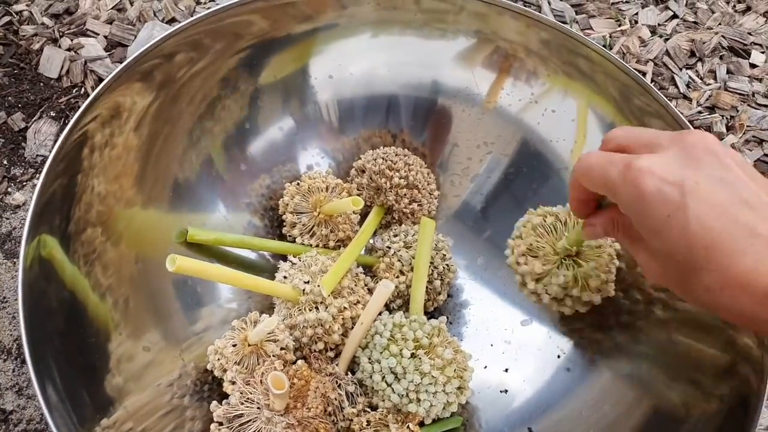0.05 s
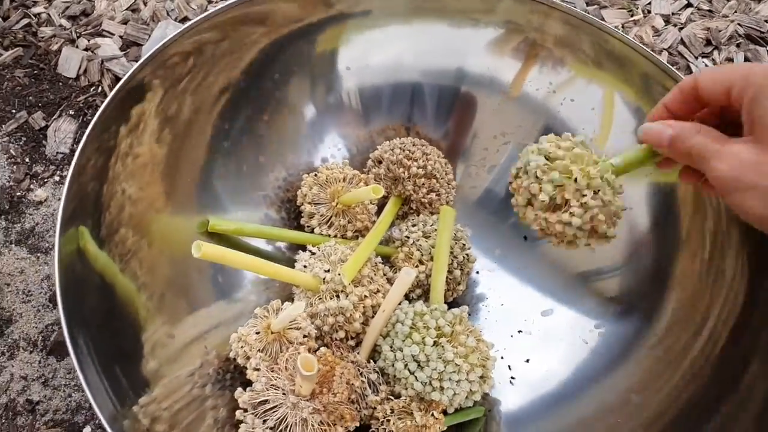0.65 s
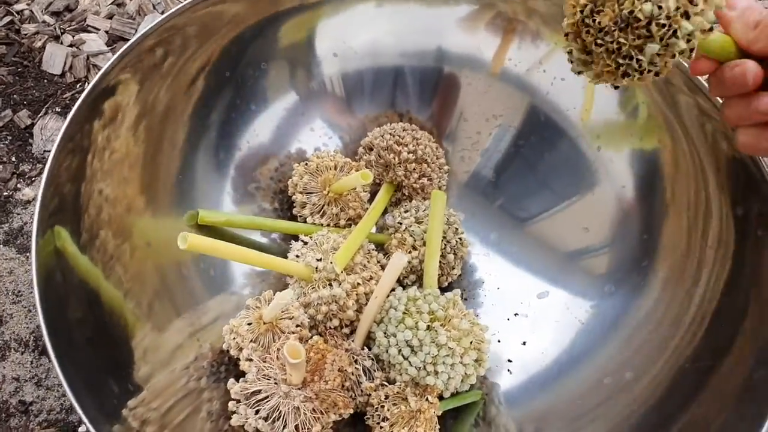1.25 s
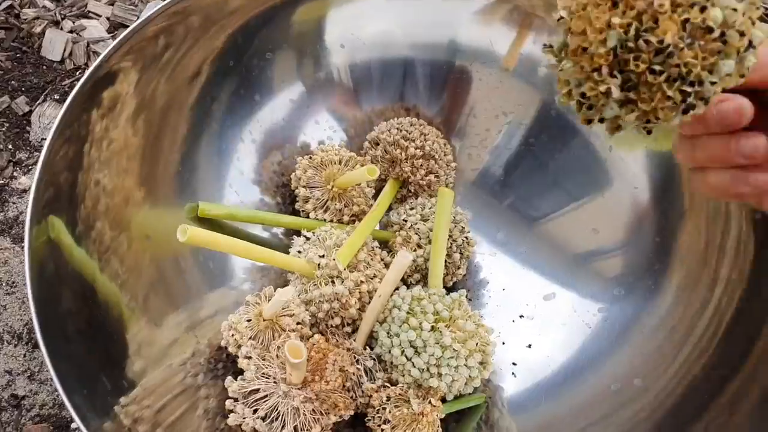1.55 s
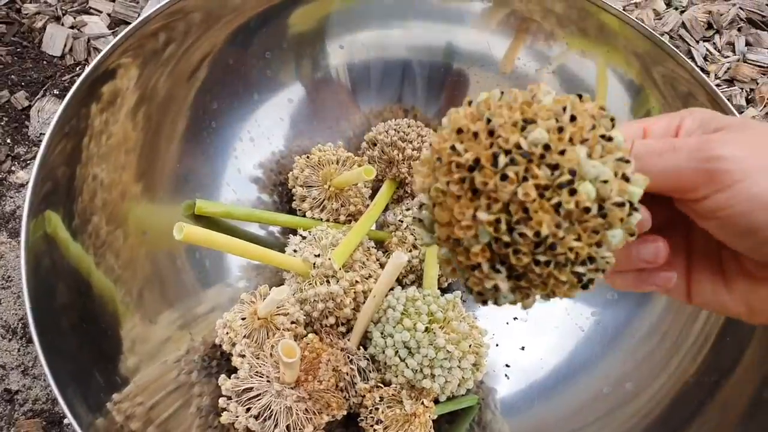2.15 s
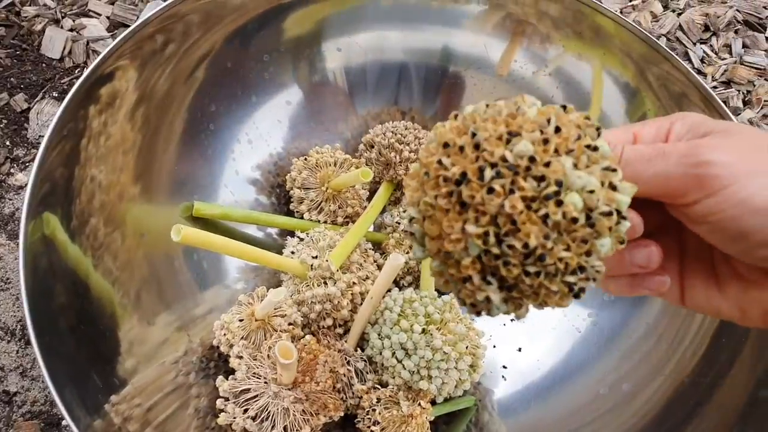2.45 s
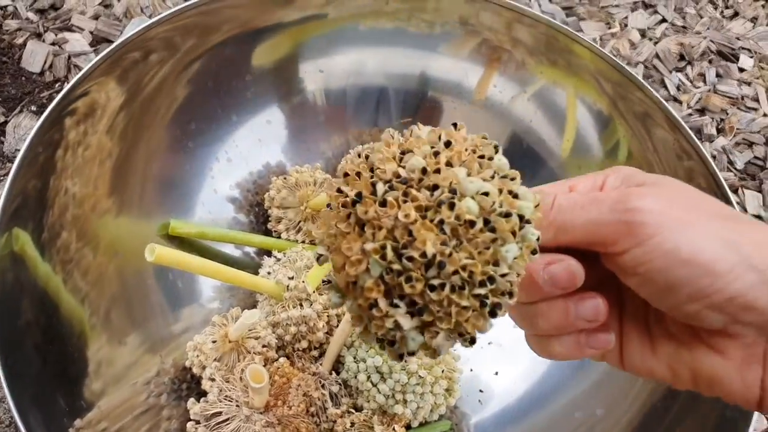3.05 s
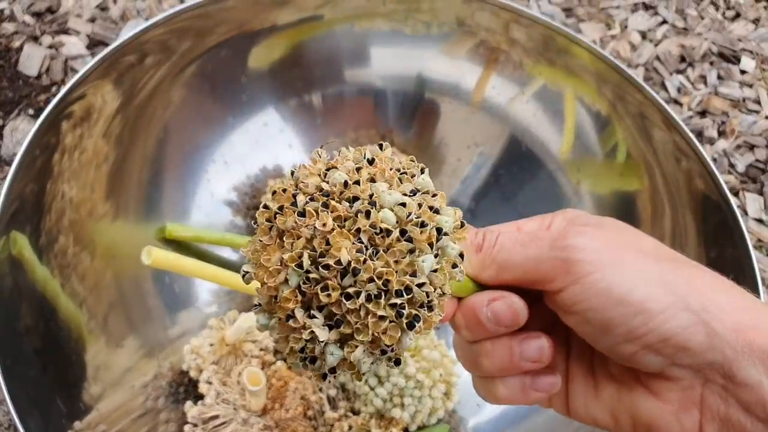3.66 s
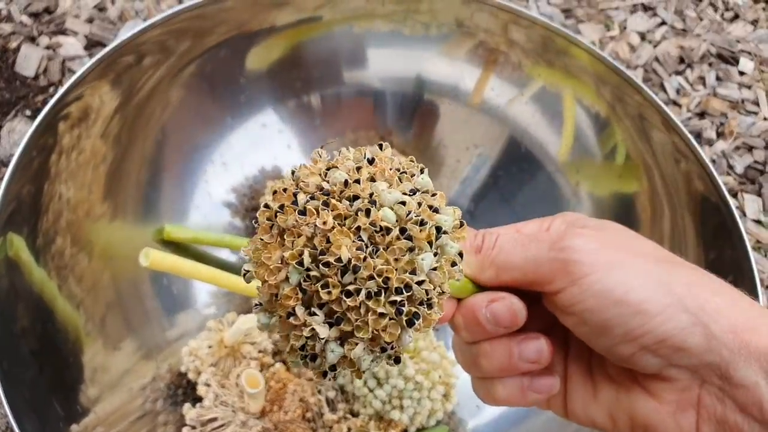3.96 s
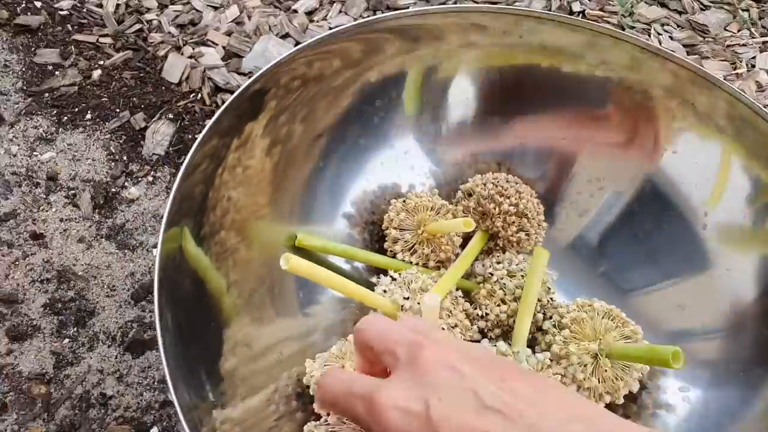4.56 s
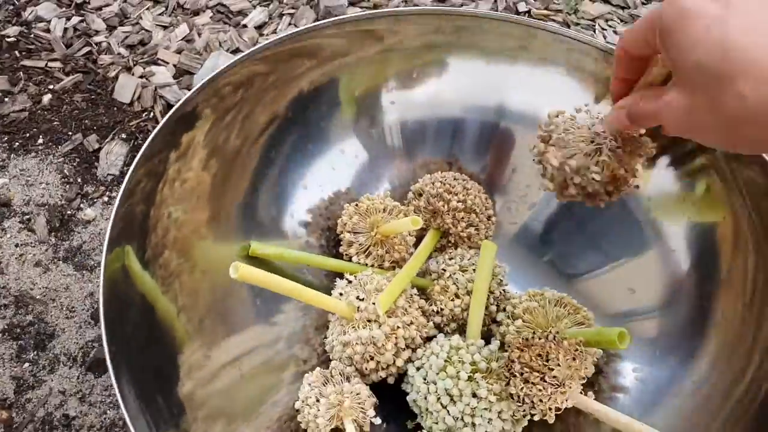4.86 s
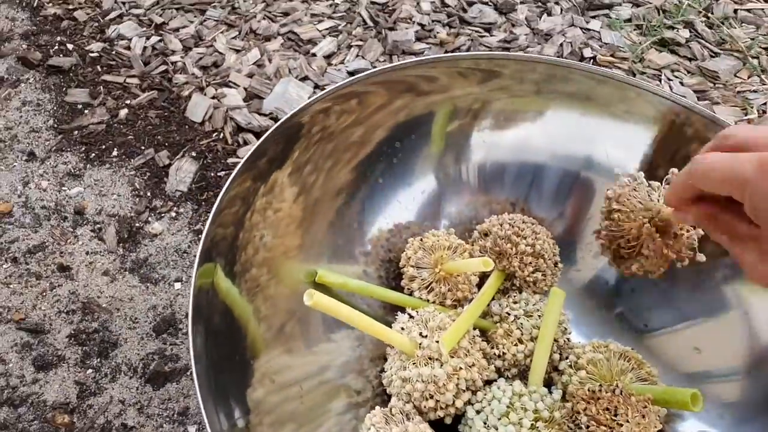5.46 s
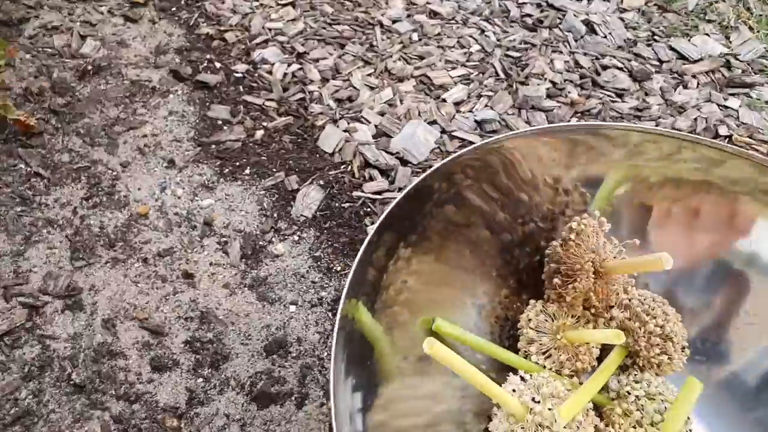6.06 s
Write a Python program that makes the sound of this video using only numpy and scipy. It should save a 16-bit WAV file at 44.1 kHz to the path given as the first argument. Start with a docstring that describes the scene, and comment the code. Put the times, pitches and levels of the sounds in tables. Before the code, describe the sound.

A few quick knocks of dry flower heads shower hard seeds into a metal bowl, which rings brightly. Low wind buffets a hand-held microphone, mostly on the right, and eases into lighter gusts in the quiet open air. Toward the end come dull, rasping handling noises as the grip shifts, along with small papery snaps of rubbed husks and a faint hum from the bowl.

```python
"""In quiet outdoor air, dry seed heads knock against a steel bowl for the first second, and loose seeds
patter on the ringing metal. Wind buffets the two microphones of a hand-held phone, hardest around one
second in, then in weaker gusts, with the odd finger tap and husk snap. From about 4.3 s the grip shifts:
fingers scuff the case while a seed head is rubbed, its husks crackling and the bowl humming faintly."""
import sys
import numpy as np
from scipy import signal
from scipy.fft import rfft, irfft
from scipy.io import wavfile
from scipy.ndimage import uniform_filter1d

SR = 44100
rng = np.random.default_rng(int(sys.argv[2]) if len(sys.argv) > 2 else 0)


def store_pcm(level_fs):
    """Save levels as 16-bit WAV."""
    pcm = np.round(np.clip(level_fs, -1, 1) * 32767).astype(np.int16)
    wavfile.write(sys.argv[1], SR, np.atleast_2d(pcm).T)


N = 277830
T = np.arange(N) / SR

# tone of the outdoor air: pitch_hz, level_db
AIR_TONE = [(30, -18.5), (150, -23.5), (350, -9.5), (550, -23.5), (800, -17), (1000, -23), (1400, -24),
            (2500, -30.5), (5000, -37), (8500, -39), (13000, -39.5), (15500, -49.5)]
# knocks that each throw a shower of seeds at the bowl: start_s, level_db, fade_s
KNOCKS = [(0.0262, -28.5, 0.0092), (0.0946, -48.5, 0.0083), (0.15, -48, 0.0086), (0.2137, -25.5, 0.014),
          (0.3997, -29, 0.013), (0.5318, -35.5, 0.0053), (0.553, -43, 0.024), (0.618, -46.5, 0.021),
          (0.6554, -41.5, 0.0056), (0.6845, -35.5, 0.0046), (0.7387, -47.5, 0.0097), (0.8138, -50, 0.0038),
          (0.8325, -58.5, 0.0081)]
# loose seeds skittering round the bowl: time_s, level_db
SKITTER = [(0.0, -55.5), (0.592, -69.5), (0.718, -64.5), (0.85, -66), (0.92, -96)]
# tone of a click on the steel wall: pitch_hz, level_db
STEEL_TONE = [(900, -35), (1500, -17), (2700, -26), (3400, -22.5), (3950, -11), (4500, -4.5), (5200, -18.5),
              (5900, -8.5), (6900, -11.5), (8000, -15), (10400, -7.5), (15500, -13.5)]
# the wall's strongest high notes: pitch_hz, level_db, ring_s
WALL_NOTES = [(4450, -9.5, 0.13), (4487, 8, 0.13), (4300, -8.5, 0.35), (4920, 6.5, 0.33),
              (4829, -43.5, 0.273), (4918, -17, .3), (5170, 0, 0.26), (5660, 0.5, .25), (6350, -0.5, 0.23)]
# short ping of one seed on the wall: pitch_hz, level_db, ring_s
PING_NOTES = [(4420, -10.5, 0.0071), (4636, -7, 0.036), (4912, -3.5, 0.021), (5410, -5.5, 0.0066)]
# strength of the breeze, mostly on the right microphone: time_s, level_db
BREEZE = [(0, -36.5), (0.76, -38.5), (0.87, -27.5), (1.08, -37.5), (1.35, -55.5), (1.52, -56.5),
          (1.75, -40), (1.91, -52.5), (2.8, -49.5), (3.25, -59), (3.8, -59.5), (4.08, -48), (4.32, -56.5),
          (4.45, -76)]
# gusts swirling round the phone: middle_s, length_s, rumble_db, sputter_db, left_minus_right_db
GUSTS = [(0.12, 0.037, -31.5, -56.5, -12), (0.25, 0.068, -31, -47, -8), (0.311, 0.046, -29.5, -44.5, -8),
         (0.502, 0.025, -34.5, -50, -5), (0.584, 0.055, -31, -46, -4), (0.852, 0.065, -35, -39, -7.5),
         (0.952, 0.048, -30, -34, -4), (1.046, 0.082, -26, -46, -4.5), (1.154, 0.053, -31, -52.5, -2),
         (1.213, 0.025, -36, -60, -28), (1.279, 0.023, -40, -56.5, -6), (1.427, 0.033, -44.5, -58, -32),
         (1.553, 0.029, -43, -53, -20.5), (1.617, 0.028, -43.5, -79, -4), (1.684, 0.048, -38, -59.5, -2.5),
         (1.82, 0.051, -32.5, -53.5, -12.5), (2, 0.034, -49, -56.5, -28), (2.153, 0.049, -42, -59, -1),
         (2.221, 0.045, -43, -53.5, -28), (2.343, 0.042, -35, -57, -19), (2.496, 0.053, -33, -47, -28),
         (2.634, 0.033, -36.5, -64, 0), (2.862, 0.031, -34, -57, -1.5), (3.036, 0.067, -44.5, -69, -2),
         (3.135, 0.057, -44.5, -87, -1.5), (3.357, 0.02, -43, -76, -7), (3.8, 0.048, -53.5, -80, 0.5),
         (3.933, 0.064, -50.5, -64.5, -22), (4.12, 0.032, -32.5, -55.5, -7), (4.179, .05, -35.5, -60.5, 3),
         (4.302, 0.073, -43, -70, 0.5)]
# tone of the large swirls of air: pitch_hz, level_db
RUMBLE_TONE = [(20, -16.5), (40, -5.5), (62, 4), (85, 3), (120, -3.5), (155, -11.5), (210, -16), (270, -22),
               (400, -38.5), (800, -74)]
# tone of the small swirls of air: pitch_hz, level_db
SPUTTER_TONE = [(100, -17), (190, -2.5), (370, 3.5), (500, -4.5), (780, -19.5), (980, -26), (2000, -49.5),
                (5000, -72)]
# single slaps of wind: middle_s, level_db, pitch_hz, left_minus_right_db
WIND_SLAPS = [(0.1206, -23, 110, -5), (0.2486, -18.5, 97, -15), (0.309, -14, 100, -25),
              (0.339, -22, 204, -8), (0.3912, -21, 97, -33), (0.494, -26, 82, 1), (0.5807, -34, 94, 20),
              (0.7396, -24.5, 78, -36), (0.8379, -20.5, 178, -4), (0.8957, -16, 114, -20),
              (0.9429, -15, 300, 1), (0.9945, -21, 104, -14), (1.045, -16, 98, -10),
              (1.141, -21.5, 170, -7), (1.276, -24.5, 89, -0.5), (1.6732, -36.5, 96, 13),
              (1.8116, -25, 93, -19), (2.2218, -29, 82, -27), (2.4842, -27.5, 89, -31),
              (2.8658, -23.5, 91, -5), (4.1185, -30, 77.5, -3.5)]
# fingers slipping or tapping on the case: middle_s, level_db, pitch_hz
SLIPS = [(0.271, -30.5, 845), (0.674, -36.5, 605), (1.554, -54, 603), (2.421, -49.5, 1050),
         (3.581, -60.5, 516), (3.616, -56, 551), (4.4166, -37.5, 557), (4.4567, -33.5, 700),
         (4.4735, -29.5, 774), (4.4974, -39.5, 1010), (4.5303, -38, 750), (4.5392, -29.5, 830),
         (4.5736, -36.5, 940), (4.598, -36, 700), (4.6217, -35, 731), (4.668, -36, 700), (4.679, -33, 750),
         (4.7037, -36.5, 754), (4.7673, -40, 640), (4.8017, -34, 900), (4.8289, -29, 810),
         (4.8412, -40, 1170), (4.8725, -32, 705), (4.9003, -31, 730), (4.9295, -32, 764), (4.951, -37, 645),
         (5.0103, -35, 700), (5.0461, -29.5, 690), (5.1397, -31.5, 560), (5.179, -40, 810),
         (5.254, -35.5, 750), (5.2734, -34, 830), (5.2877, -26.5, 720), (5.308, -36, 1095),
         (5.3301, -26.5, 766), (5.369, -27, 730), (5.3805, -30, 570), (5.4362, -41, 730),
         (5.4894, -32.5, 536), (5.59, -46.5, 444), (5.6178, -42.5, 720), (5.711, -44, 616),
         (5.7793, -36, 654), (5.801, -29.5, 600), (5.8414, -33, 630), (5.8564, -29.5, 760),
         (5.8679, -38, 730), (5.9304, -35, 570)]
# dull tone of the phone's case: pitch_hz, level_db
CASE_TONE = [(30, -21.5), (150, -17.5), (280, -10.5), (430, -0.5), (620, 0), (820, -4.5), (1050, -12),
             (1500, -19), (2500, -26.5), (5000, -51.5)]
# tone of rasping skin: pitch_hz, level_db
RASP_TONE = [(500, -3), (1200, 5), (1800, 0.5), (2500, -3), (3200, -3), (4000, -11.5), (5200, -22.5),
             (8000, -34)]
# finger strokes across the case: start_s, length_s, scuff_db, rasp_db
STROKES = [(4.353, .06, -49.5, -63.5), (4.442, 0.06, -42, -51), (4.465, 0.016, -34, -43.5),
           (4.513, 0.024, -38.5, -63), (4.565, 0.054, -43, -51), (4.65, 0.059, -42.5, -48),
           (4.754, 0.042, -39.5, -57), (4.781, 0.067, -38.5, -40.5), (4.857, 0.088, -41.5, -48.5),
           (4.956, 0.065, -47.5, -62), (4.992, 0.094, -45, -53), (5.074, 0.04, -45, -64),
           (5.183, 0.022, -48.5, -67), (5.214, 0.058, -47, -55), (5.268, 0.12, -38.5, -43),
           (5.397, 0.028, -42, -46.5), (5.755, 0.1, -42.5, -53.5), (5.874, 0.026, -47.5, -72),
           (6.115, 0.13, -64.5, -73.5), (6.24, 0.054, -63, -67.5)]
# the light touch that lasts between strokes: start_s, length_s, scuff_db, rasp_db
LIGHT_TOUCH = [(4.36, 1.58, -56, -75.5)]
# dry husks snapping: start_s, level_db
SNAPS = [(1.2157, -69.5), (1.736, -60), (2.5253, -64), (4.4437, -60), (4.5277, -57), (4.578, -53),
         (4.7594, -57), (4.8, -54), (4.997, -61), (5.07, -48.5), (5.349, -47), (5.37, -47.5),
         (5.454, -50.5), (5.477, -49.5), (5.524, -48.5), (5.545, -47), (5.5878, -54), (5.6137, -52),
         (5.6363, -61), (5.6614, -55.5), (5.6867, -58), (5.7094, -63), (5.7306, -51.5), (5.7563, -51),
         (5.781, -49.5), (5.8062, -50), (5.83, -47.5), (5.9257, -52.5), (6.0002, -61), (6.0362, -73),
         (6.133, -56), (6.179, -58), (6.2575, -59)]
# tone of crackling husks: pitch_hz, level_db
HUSK_TONE = [(1500, -15), (3200, -7.5), (5000, -8.5), (7500, -2), (10000, -0.5), (13000, 0), (15500, -15)]
# rubs of the seed head between the fingers: start_s, length_s, level_db
RUBS = [(4.315, 0.18, -73), (4.56, .14, -66), (4.748, 0.18, -69), (4.985, 0.44, -64.5), (5.05, 0.055, -60),
        (5.48, 0.4, -68), (5.895, .04, -63), (5.995, 0.055, -76.5), (6.11, 0.077, -60),
        (6.245, 0.061, -70.5)]
# low notes of the whole bowl bending: pitch_hz, level_db, ring_s
BOWL_NOTES = [(420, 4, 0.078), (486, -12, 1), (607, 8, 0.11), (706, -6, 0.25), (820, -2, 0.65),
              (947, -9, 0.86), (1084, -11.5, 0.16), (1237, -11, 0.37), (1540, -42, 1)]
# the bowl's hum under the rubbing: time_s, level_db
HUM = [(4.3, -68), (4.5, -77), (5.6, -106), (6.03, -68), (6.14, -58.5), (6.3, -58.5)]


def amp(db):
    """Turn decibels into a gain, a number to multiply a sound by."""
    return 10 ** (np.asarray(db) / 20)


def unit(x):
    """Scale a sound to an average power of 1."""
    return x / np.sqrt(np.mean(x ** 2))


def swell(table):
    """Gain that follows (time_s, level_db) points and fades quickly beyond their ends."""
    times, levels = np.transpose(table)
    outside_s = np.maximum(np.maximum(times[0] - T, T - times[-1]), 0)
    return amp(np.interp(T, times, levels) - 400 * outside_s)


def sides(left_minus_right_db):
    """Left and right gains with an average power of 1."""
    pair = amp(np.array([left_minus_right_db, -left_minus_right_db]).reshape(2, -1) / 2)
    return pair / np.sqrt(np.mean(pair ** 2, axis=0))


def tone(points, size=8192):
    """A click whose tone follows (pitch_hz, level_db) points, for use as a filter."""
    hz, db = np.transpose(points)
    pitches = np.maximum(np.arange(size // 2 + 1) * SR / size, 1)
    cepstrum = irfft(np.log(amp(np.interp(np.log(pitches), np.log(hz), db))))
    # keep the tone but move the energy to the start of the click
    cepstrum[1:size // 2] *= 2
    cepstrum[size // 2 + 1:] = 0
    click = irfft(np.exp(rfft(cepstrum)))
    return click / np.linalg.norm(click)


def through(x, response):
    """Filter both channels with a tone, ring or tail."""
    return signal.fftconvolve(x, np.atleast_2d(response), axes=1)[:, :x.shape[1]]


def ring(notes):
    """Notes of struck metal, each dying away by 60 dB in its ring_s."""
    t = T[:SR]
    ringing = sum(amp(db - 60 * t / ring_s) * np.sin(2 * np.pi * (hz * t + rng.random((2, 1))))
                  for hz, db, ring_s in notes)
    return unit(ringing) / np.sqrt(SR)


def tail(fade_s):
    """A fading wash of noise, different on the left and right."""
    return unit(rng.standard_normal((2, SR)) * np.exp(-T[:SR] / fade_s)) / np.sqrt(SR)


def grains(per_s, spread_db, shared):
    """Random tiny hits of uneven size; a share of them reaches both microphones alike."""
    hits = (rng.random((3, N)) < per_s / SR) * rng.choice([-1, 1], (3, N))
    hits = hits * amp(spread_db * np.clip(rng.standard_normal((3, N)), -2, 2))
    return unit(np.sqrt(1 - shared) * hits[:2] + np.sqrt(shared) * hits[2])


def flutter(rate_hz, depth_db):
    """Gain that wanders at random, on its own at each microphone."""
    hold = int(SR / rate_hz)
    steps = np.repeat(rng.standard_normal((2, N // hold + 1)), hold, axis=1)[:, :N]
    return unit(amp(depth_db * uniform_filter1d(steps, hold, axis=1)))


def even(x, span_s):
    """Even out slow changes in loudness, keeping the grain faster than span_s."""
    power = uniform_filter1d(x ** 2, int(span_s * SR), axis=1)
    return x / np.sqrt(np.abs(power) + 1e-9)


def thump(hz, cycles, phase_spread):
    """A brief pressure wave, loudest 0.05 s in, out of step between the microphones."""
    t = T[:SR // 10] - 0.05
    phase = rng.uniform(0, 2 * np.pi) + phase_spread * rng.standard_normal((2, 1))
    return np.exp(-(t * hz / cycles) ** 2) * np.cos(2 * np.pi * hz * t + phase)


def add(out, start_s, sound):
    """Mix a short sound in at start_s."""
    start = int(np.clip(start_s * SR, 0, N - 1))
    out[..., start:start + sound.shape[-1]] += sound[..., :N - start]


def gestures(table, level_column=2, rise_s=0.015, fade_s=0.015):
    """Gain of hand movements: each rises, holds until its length is up and dies away."""
    power, age = np.zeros(N), T[:2 * SR]
    for row in table:
        start_s, length_s = row[:2]
        shape = np.minimum(age / rise_s, 1) * np.exp(-np.clip((age - length_s) / fade_s, 0, 20))
        add(power, start_s, (amp(row[level_column]) * shape) ** 2)
    return np.sqrt(power)


def outdoor_air(hiss_db=-81.5):
    """Quiet, steady air, its level set by the hiss above 1500 Hz."""
    air = through(rng.standard_normal((2, N)), tone(AIR_TONE))
    hiss = signal.sosfilt(signal.butter(4, 1500, "high", fs=SR, output="sos"), air)
    return air / hiss.std() * amp(hiss_db)


def seeds(rise_s=0.0071, early_s=0.00298, bounce_s=0.022):
    """Each knock throws a shower of hard seeds at the steel; they click, bounce and ring the wall."""
    t = T[:SR // 3]
    shower = np.zeros(N)
    rolling = amp(-2) * swell(SKITTER)
    for start_s, db, fade_s in KNOCKS:
        add(shower, start_s - early_s, amp(db - 3) * np.minimum(t / rise_s, 1) * np.exp(-t / fade_s))
        add(rolling, start_s, amp(db - 17) * np.exp(-t / bounce_s))
    hits = shower * even(grains(per_s=2500, spread_db=5, shared=0.3), 0.008)
    hits += rolling * grains(per_s=1500, spread_db=3, shared=0.3)
    # the few heavier seeds are heard one by one
    heavy = even(grains(per_s=220, spread_db=3, shared=0.7), 0.04)
    pings = through((rolling + amp(-2) * shower) * heavy, ring(PING_NOTES))
    clicks = through(hits, tone(STEEL_TONE))
    shimmer = amp(-7) * through(clicks, tail(fade_s=0.068))
    ringing = amp(-13) * through(hits, ring(WALL_NOTES))
    return (amp(-3) * clicks + pings + shimmer + ringing) * sides(2.9)


def wind_strength(breeze_side_db=-27, sputter_side_share=0.1165, growth=1.42):
    """Gains of large and small swirls in a one-sided breeze with gusts; small ones reach both sides."""
    breeze = swell(BREEZE)
    sputter = amp(-50) * (breeze / amp(-37)) ** growth  # small swirls grow faster than the breeze
    large_power = (breeze * sides(breeze_side_db)) ** 2
    small_power = (sputter * sides(sputter_side_share * breeze_side_db)) ** 2
    for middle_s, length_s, rumble_db, sputter_db, side_db in GUSTS:
        near = slice(*np.searchsorted(T, [middle_s - 2 * length_s, middle_s + 2 * length_s]))
        hump = np.exp(-(2 * (T[near] - middle_s) / length_s) ** 2)
        large_power[:, near] += hump * (amp(rumble_db) * sides(side_db)) ** 2
        small_power[:, near] += hump * (amp(sputter_db) * sides(sputter_side_share * side_db)) ** 2
    return np.sqrt(large_power), np.sqrt(small_power)


def wind():
    """Large swirls of air rumble on each microphone, small ones sputter; some slap the phone."""
    unsteadiness = flutter(rate_hz=42, depth_db=1)
    rumble = even(through(rng.standard_normal((2, N)), tone(RUMBLE_TONE)), 0.075)
    puffs = rng.standard_normal((2, N)) * flutter(rate_hz=77, depth_db=13)
    sputter = even(through(puffs, tone(SPUTTER_TONE)), 0.05)
    large, small = wind_strength()
    out = (amp(0.5) * large * rumble + amp(1.5) * small * sputter) * unsteadiness
    for middle_s, db, hz, side_db in WIND_SLAPS:
        slap = thump(hz, cycles=0.58, phase_spread=0.94)
        add(out, middle_s - 0.05, amp(db - 3) * sides(side_db) * slap)
    return out


def fingers(crunch_s=0.0037):
    """Skin sticks and slips on the case: dull ticks and a rasp, with a short crunch at each big jerk."""
    grip = flutter(rate_hz=120, depth_db=4)
    case_ticks = grip * grains(per_s=600, spread_db=5, shared=0)
    scuff = even(through(case_ticks, tone(CASE_TONE)), 0.022)
    catch = flutter(rate_hz=290, depth_db=2.5)[0]  # skin ridges catch and let go, shaking the whole case
    skin_ticks = grip * grains(per_s=550, spread_db=5, shared=0)
    rasp = catch * even(through(skin_ticks, tone(RASP_TONE)), 0.035)
    jerks, crunch = np.zeros((2, N)), np.zeros(N)
    hump = np.exp(-((T[:SR // 10] - 0.05) / crunch_s) ** 2)
    for middle_s, db, hz in SLIPS:
        add(jerks, middle_s - 0.05, amp(db + 0.5) * thump(hz, cycles=0.77, phase_spread=1.08))
        add(crunch, middle_s - 0.05, amp(db) * hump)
    sliding = T > LIGHT_TOUCH[0][0]  # taps rasp only once the skin has begun to slide
    touches = LIGHT_TOUCH + STROKES
    scuff *= amp(-3) * gestures(touches) + amp(-9) * crunch
    rasp *= gestures(touches, level_column=3) + amp(-19) * crunch * sliding
    return scuff + rasp + jerks


def husks(snap_s=0.0032, right_delay_s=0.000215):
    """Papery husks break in small clusters over a fine rustle; the bowl scatters the crackle."""
    snaps = np.zeros(N)
    for start_s, db in SNAPS:
        add(snaps, start_s, amp(db) * np.exp(-T[:SR // 10] / snap_s))
    cracks = snaps * even(grains(per_s=6000, spread_db=4, shared=0.7), 0.003)
    rubbing = amp(-1) * gestures(RUBS, rise_s=0.017)
    rustle = rubbing * even(grains(per_s=450, spread_db=5, shared=0.75), 0.05)
    left, right = through(cracks + rustle, tone(HUSK_TONE))
    direct = np.array([left, np.interp(T - right_delay_s, T, right)])
    scatter = amp(-3) * through(direct, tail(fade_s=0.007))
    return (direct + scatter) * sides(0.82)


def bowl_hum():
    """The tiny hits of rubbing keep the bowl's low notes sounding softly."""
    hits = grains(per_s=300, spread_db=0, shared=0.95)
    ringing = even(through(hits, ring(BOWL_NOTES)), 0.062)
    return swell(HUM) * ringing * sides(-1)


def scene():
    """All the sounds together at the two microphones."""
    return outdoor_air() + seeds() + wind() + fingers() + husks() + bowl_hum()


def record(dry, top_hz=15900):
    """The phone cuts off the highest treble."""
    return signal.sosfilt(signal.ellip(10, 0.2, 80, top_hz, fs=SR, output="sos"), dry)


dry = scene()
out = record(dry)
store_pcm(out)
```